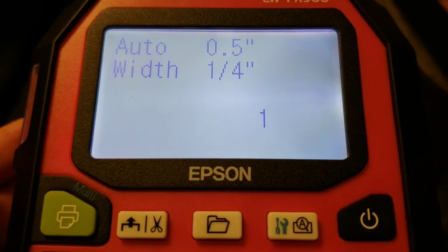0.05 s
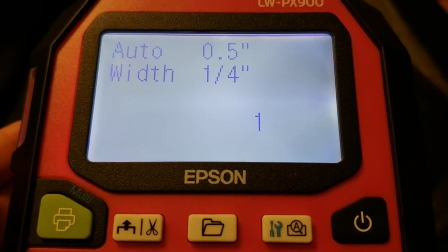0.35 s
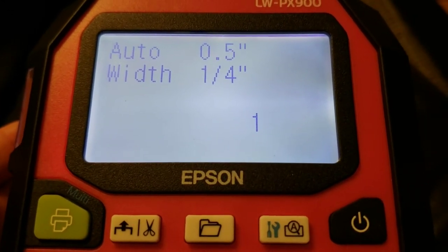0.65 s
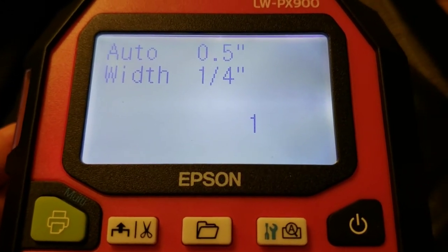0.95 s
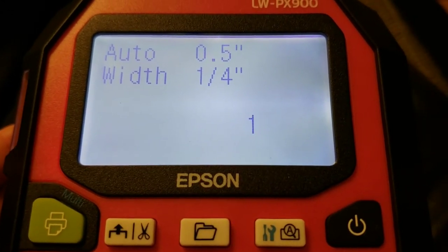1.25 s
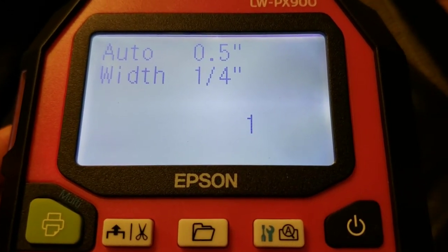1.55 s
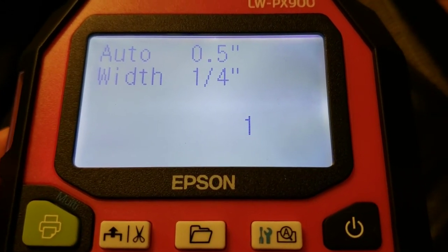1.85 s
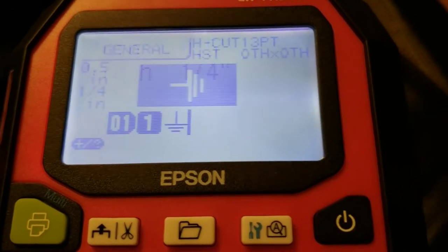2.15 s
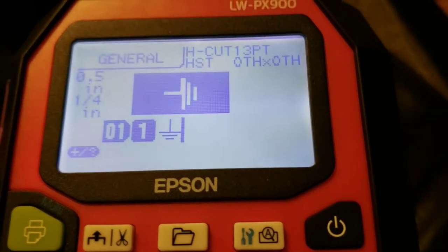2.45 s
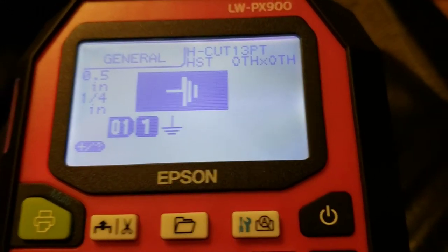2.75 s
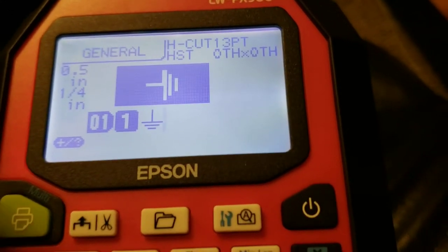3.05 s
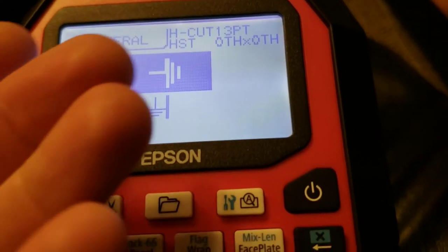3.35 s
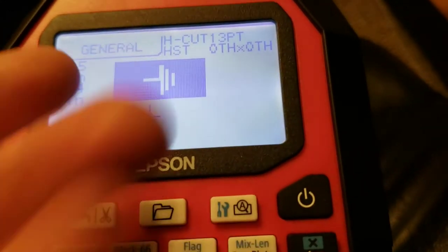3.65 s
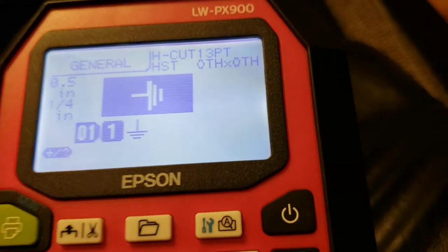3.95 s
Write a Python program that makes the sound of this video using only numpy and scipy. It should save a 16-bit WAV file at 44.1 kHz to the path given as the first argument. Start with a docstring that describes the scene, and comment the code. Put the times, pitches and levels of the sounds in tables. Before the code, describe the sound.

Close up in a quiet room, a small label printer whirs with a shifting pitch and brief scrapes, then buzzes, clicks sharply once and stops. Faint rubbing and two dull bumps of a hand follow over a low hum.

```python
"""A geared motor whines and rattles: a handheld label printer, close by in a quiet room.
Its meshing teeth labour against the scraping cutter, then it reverses and runs back.
A stepper feeds the tape with a fine buzz and one sharp plastic snap.
Afterwards a hand slides over the case and bumps it softly, above a low hum."""
import sys
import numpy as np
from scipy import signal
from scipy.fft import rfft, irfft
from scipy.io import wavfile
from scipy.ndimage import uniform_filter1d

SR = 44100
rng = np.random.default_rng(int(sys.argv[2]) if len(sys.argv) > 2 else 0)


def unload_audio(sound):
    """Save the sound as a 16-bit wav file, at the path given as the first command line argument."""
    columns = np.transpose(np.atleast_2d(sound))
    # keep every value between -1 and 1, then stretch to whole-number steps
    steps = np.round(np.clip(columns, -1, 1) * 32767)
    wavfile.write(sys.argv[1], SR, steps.astype(np.int16))


N = 176400
TIME_S, FREQS_HZ = np.arange(N) / SR, np.fft.rfftfreq(N, 1 / SR)


# Each row: time in seconds, tooth rate in Hz, whine in dB, rattle in dB.
MOTOR_RUN = [(0, 1853, -48.5, -95), (.026, 1419, -44, -54.5), (.045, 1135, -57, -59),
             (.065, 953.5, -62, -57.5), (.135, 660.2, -54, -40.5), (.19, 999, -53, -50),
             (.246, 1406, -44.5, -48), (.285, 1854, -43.5, -49.5), (.345, 2032, -44, -49),
             (.378, 1588, -35.5, -49.5), (.408, 1281, -46, -49.5), (.555, 1280, -41.5, -48),
             (.6, 1266, -45.5, -46.5), (.698, 1271, -44.5, -45.5), (.75, 1280, -47.5, -44),
             (.775, 1197, -69, -43.5), (.82, 662.5, -56, -41), (.855, 962.5, -55, -46.5),
             (.88, 1189, -43.5, -46.5), (.915, 1504, -40, -44), (.943, 1786, -41.5, -48),
             (1.27, 1790, -45, -47), (1.315, 1744, -59, -48), (1.345, 1387, -79, -65),
             (1.42, 999, -125, -125)]
# Each row: multiple of the tooth rate, relative level in dB.
WHINE_OVERTONES = [(2, -16.5), (3, -32)]
# Each row: time in seconds, gain in dB.
OVERTONE_SWELL = [(.34, -13.5), (.45, -2.5), (.9, -0.5)]
RATTLE_TREBLE = [(.15, -2.5), (.45, -4), (.75, -6), (.9, 3), (1.1, 6.5), (1.3, 3)]
# Each row: frequency in Hz, gain in dB.
OVERTONE_CASE_GAIN = [(2200, -3.5), (2570, 3.5), (2900, 0), (5400, 3.5)]
RATTLE_COLOUR = [(59.3, -16.5), (105.5, 2), (150, -14.5), (450, -7.5), (1000, -10.5), (1450, 0),
                 (3300, -17.5), (4020, -20), (4440, -27.5), (7300, -29), (8700, -35), (11200, -32.5),
                 (15300, -48)]
TEETH_PER_TURN, SPEED_JITTER, BACKLASH_RAD = 17, 0.006, 0.4

def geared_motor():
    """Meshing teeth whine and rattle, swelling once per turn of the shaft."""
    tooth_hz = curve(MOTOR_RUN) * (1 + SPEED_JITTER * walk(60))
    teeth = np.cumsum(tooth_hz) / SR
    turns = teeth / TEETH_PER_TURN
    wobble = np.sin(2 * np.pi * turns)
    mesh_rad = 2 * np.pi * teeth + BACKLASH_RAD * walk(420)
    whine = amp(2.6 * walk(130)) * np.sin(mesh_rad)
    for multiple, db in WHINE_OVERTONES:
        level_db = db + curve(OVERTONE_SWELL) + spectrum(multiple * tooth_hz, OVERTONE_CASE_GAIN)
        whine += amp(level_db + 2.6 * walk(130)) * np.sin(multiple * mesh_rad)
    whine = unit(whine * (1 + 0.25 * wobble))
    knocks = impacts(teeth, scatter_db=3, ring_s=0.00072) * (1 + 0.2 * wobble)
    rattle = unit(case(colour(knocks * gear_grit(turns, repeat_db=-3), RATTLE_COLOUR)))
    body = lowpass(rattle, 2900)
    rattle = body + amp(curve(RATTLE_TREBLE)) * (rattle - body)
    return whine * amp(curve(MOTOR_RUN, column=2)) + rattle * amp(curve(MOTOR_RUN, column=3))


def gear_grit(turns, repeat_db):
    """Fresh stereo grit plus a part that repeats on every turn."""
    slots = 420
    position = (turns % 1 * slots).astype(int)
    return stereo_noise() + amp(repeat_db) * stereo_noise()[:, slots + position]


# Each row: start in seconds, length in seconds, relative level in dB.
SCRAPES = [(0.074, 0.031, -32.5), (0.119, 0.0064, -35), (0.191, 0.001, -47.5), (0.778, 0.016, -38.5)]
# Each row: start in seconds, relative level in dB.
GEAR_CATCHES = [(.289, -46.5), (.622, -39), (.693, -48)]
# Each row: frequency in Hz, gain in dB.
SCRAPE_COLOUR = [(400, -11), (970, -14), (1380, 1), (2040, -3), (2980, -5), (4400, -20), (9000, -30),
                 (15800, -32.5)]
SCRAPE_ATTACK_S, SCRAPE_RELEASE_S, SLIP_HZ = 0.0061, 0.0072, 1496

def cutter():
    """The cutter sticks and slips in dense crunches; loaded gear teeth catch."""
    force = 0
    for start_s, length_s, db in SCRAPES:
        attack = np.clip((TIME_S - start_s) / SCRAPE_ATTACK_S + 1, 0, 1)
        release = np.exp(-np.maximum(TIME_S - start_s - length_s, 0) / SCRAPE_RELEASE_S)
        force += amp(db) * attack * release
    slip_hz = SLIP_HZ * amp(2 * walk(2000))
    slips = impacts(np.cumsum(slip_hz) / SR, scatter_db=0.5, ring_s=0.001)
    catches = sum(amp(db) * decay(start_s, ring_s=0.003) for start_s, db in GEAR_CATCHES)
    return case(colour((force * slips + catches) * stereo_noise(), SCRAPE_COLOUR)) * amp(-1.5)


# Each row: time in seconds, body in dB, treble in dB.
FEED_LEVELS = [(1.352, -74, -78), (1.368, -47.5, -69.5), (1.4, -45, -53), (1.47, -47, -52.5),
               (1.75, -46.5, -53), (1.79, -41, -56.5), (1.92, -45.5, -52.5), (2.005, -51, -60),
               (2.045, -56.5, -76), (2.07, -64, -76), (2.25, -125, -125)]
# Each row: frequency in Hz, gain in dB.
FEED_COLOUR = [(870, -17.5), (1327, -2), (2100, 0), (2560, -16.5), (3780, -9), (4660, -16), (5680, -22.5),
               (6800, -16.5), (8060, -24), (9120, -36.5), (11900, -25), (15500, -29)]
STEP_HZ, STEPS_PER_TURN, TAPE_GRIT = 245.4, 3, 0.87

def tape_feed():
    """Motor steps tick through the gears, over the grit of the moving tape."""
    steps = STEP_HZ * TIME_S
    ticks = impacts(steps, scatter_db=3, ring_s=0.0032, accent_db=1)
    grit = gear_grit(steps / STEPS_PER_TURN, repeat_db=-6)
    buzz = unit(case(colour((ticks + TAPE_GRIT) * grit, FEED_COLOUR)))
    body = lowpass(buzz, 4000)
    return unit(body) * amp(curve(FEED_LEVELS)) + unit(buzz - body) * amp(curve(FEED_LEVELS, column=2))


# Each row: start in seconds, level in dB, decay in seconds.
CLICKS = [(1.7619, -23.5, .0011), (3.382, -52, .0012), (3.408, -70, .008)]
CASE_KNOCK = (1.7637, -32, 0.0088)
# Each row: frequency in Hz, gain in dB.
CLICK_COLOUR = [(300, -14), (1400, -5), (6000, -2), (9000, -10), (12000, -2)]
KNOCK_COLOUR = [(100, -24), (346, 5), (700, 7), (2840, 4.5), (5070, -10.5)]

def clicks():
    """Plastic parts snap; the hardest snap knocks the whole case."""
    snaps = sum(amp(db) * decay(start_s, ring_s) for start_s, db, ring_s in CLICKS)
    start_s, db, ring_s = CASE_KNOCK
    knock = amp(db) * decay(start_s, ring_s)
    return colour(snaps * stereo_noise(), CLICK_COLOUR) + colour(knock * stereo_noise(), KNOCK_COLOUR)


# Each row: frequency in Hz, bandwidth in Hz, gain in dB.
CASE_MODES = [(747, 17, -0.5), (1336, 26, -3.5), (1467, 74, -5), (2080, 23, -3), (2328, 7.5, -12.5),
              (3160, 18, 3.5)]

def case(x):
    """The plastic case adds its resonances."""
    return x + sum(amp(db) * signal.lfilter(*signal.iirpeak(hz, hz / width_hz, SR), x)
                   for hz, width_hz, db in CASE_MODES)


# Each row: start in seconds, end in seconds, pitch in Hz, level in dB.
FEED_WHINES = [(1.359, 2.051, 1448, -55.5), (1.769, 1.967, 1288, -53), (1.78, 1.939, 757, -58.5)]

def feed_whines():
    """The loaded feed gears sing on a few wavering notes."""
    notes = 0
    for start_s, end_s, hz, db in FEED_WHINES:
        level = amp(db + 2 * walk(120)) * gate(start_s, end_s, ramp_s=0.0067)
        notes += level * np.sin(2 * np.pi * hz * TIME_S + 0.31 * walk(60))
    return notes


# One row: start in seconds, end in seconds, pitch in Hz, level in dB, fall in dB per second.
MOTOR_WHISTLE = (.405, .7, 7480, -68, 28)

def motor_whistle():
    """A thin, fading note of the loaded motor."""
    start_s, end_s, hz, db, fall_db_per_s = MOTOR_WHISTLE
    level = amp(db - fall_db_per_s * (TIME_S - start_s) + 2 * walk(90.6))
    tone = np.sin(2 * np.pi * hz * TIME_S + 0.66 * walk(90))
    return gate(start_s, end_s, ramp_s=0.01) * level * tone


# Each row: start in seconds, peak in dB.
BUMPS = [(2.857, -43.5), (2.88, -39.5), (2.893, -30), (2.903, -40), (3.135, -26.5), (3.192, -43.5)]
# Each row: frequency in Hz, gain in dB.
BUMP_COLOUR = [(40, -19), (110, -0.5), (220, 5), (400, -3.5), (650, -10), (1000, -27.5), (1600, -29),
               (9000, -67)]

def hand_bumps():
    """Soft skin strikes the case: dull thuds with short noisy tails."""
    pushes = np.zeros(N)
    for start_s, db in BUMPS:
        pushes[int(start_s * SR)] += amp(db)
    blow = amp(-11) * unit(decay(0, ring_s=0.014) * stereo_noise()) / np.sqrt(N)
    blow[:, 0] += 1  # impulse ahead of the tail
    thud = signal.sosfilt(signal.butter(2, 1100, fs=SR, output="sos"), colour(blow, BUMP_COLOUR))
    return signal.fftconvolve(pushes[None], thud / np.abs(thud).max(), axes=1)[:, :N]


# Each row: centre in seconds, half length in seconds, then rub, rustle and sheen in dB.
STROKES = [(2.117, 0.13, -69, -78, -100), (2.366, 0.13, -66.5, -66.5, -64), (2.797, 0.24, -80, -73, -75),
           (3.048, 0.012, -97, -93, -72), (3.198, 0.047, -81.5, -80.5, -90),
           (3.84, 0.079, -78.5, -75.5, -75)]
# One table each for rub, rustle and sheen. Each row: frequency in Hz, gain in dB.
STROKE_COLOURS = [
    [(1200, -8.5), (2500, 0), (5500, -0.5), (9000, -32)],
    [(4500, -27.5), (7000, -1.5), (10000, -29)],
    [(8500, -14), (11500, -5)],
]

def hand_strokes():
    """Skin slides over the case in grainy swells of three noise bands."""
    strokes = np.array(STROKES)
    centre_s, half_s, bands_db = strokes[:, :1], strokes[:, 1:2], strokes[:, 2:]
    levels = amp(bands_db).T @ swell(centre_s, half_s) * amp(walk(200))
    return sum(colour(stereo_noise() * level, rows) for level, rows in zip(levels, STROKE_COLOURS))


# Each row: time in seconds, level in dB.
RUMBLE_LEVEL = [(0, -63), (1.7, -57.5), (2.1, -59), (2.18, -56.5), (2.24, -58.5), (2.65, -59.5), (4, -72)]
# Each row: frequency in Hz, gain in dB.
RUMBLE_COLOUR = [(26, -40.5), (43, 1), (62, 0), (100, -1), (170, -11), (330, -15.5), (550, -34),
                 (1200, -47.5)]

def hand_rumble():
    """The held case rumbles."""
    return colour(stereo_noise(), RUMBLE_COLOUR) * amp(curve(RUMBLE_LEVEL))


# Each row: centre in seconds, half length in seconds, pitch in Hz, glide in Hz per second, level in dB.
SQUEAKS = [(3.405, .025, 2560, 9500, -79), (3.845, .08, 1910, 0, -75)]

def faint_squeaks():
    """A faint rising chirp, then a soft, rough, steady whistle."""
    tones = 0
    for centre_s, half_s, hz, glide_hz_per_s, db in SQUEAKS:
        offset_s = TIME_S - centre_s
        cycles = offset_s * (hz + glide_hz_per_s * offset_s / 2)
        level = amp(db + 3 * walk(194)) * swell(centre_s, half_s)
        tones += level * np.sin(2 * np.pi * cycles + 1.3 * walk(400))
    return tones


# Each row: frequency in Hz, gain in dB.
AIR_COLOUR = [(20, -33), (55, 0.5), (140, -10), (330, -14), (550, -28), (1200, -34), (5500, -43.5),
              (7300, -48.5), (8800, -57), (12000, -39), (15500, -42)]
AIR_DB, HUM_HZ, HUM_DB = -62.5, 59.6, -61

def room():
    """A wavering low hum over quiet air."""
    air = colour(stereo_noise() + rng.standard_normal((2, N)), AIR_COLOUR)
    hum = np.sin(2 * np.pi * HUM_HZ * TIME_S + 0.33 * walk(8.3)) * amp(2 * walk(16))
    return amp(AIR_DB) * unit(air) + amp(HUM_DB) * unit(hum)


# Each row: frequency in Hz, left minus right in dB.
MIC_BALANCE = [(400, -1), (950, 5.5), (1500, -4), (2200, -7), (2850, 5), (5000, 2.5), (6600, 23.5),
               (10000, 16), (12000, 3.5)]
# Each row: frequency in Hz, lead of the left in radians.
MIC_PHASE = [(200, 0), (1250, .5), (1800, 2.7), (2400, 6.2), (3000, 7), (3900, 13.5), (5000, 10.8),
             (7000, 12.6)]

def microphones(x):
    """Two microphones hear a close sound from different sides."""
    split = np.array([[0.5], [-0.5]])
    gain = amp(split * spectrum(FREQS_HZ, MIC_BALANCE))
    gain /= np.sqrt(np.mean(gain ** 2, axis=0))
    return irfft(rfft(x) * gain * np.exp(1j * split * spectrum(FREQS_HZ, MIC_PHASE)), N)


# Each row: frequency in Hz, correlation of left and right.
STEREO_CORRELATION = [(300, .96), (1700, .85), (2200, .65), (7000, .35)]

def stereo_noise():
    """Noise whose sides move together in the bass, more independently above."""
    alike = spectrum(FREQS_HZ, STEREO_CORRELATION)
    mid, side = rfft(rng.standard_normal((2, N))) * np.sqrt([(1 + alike) / 2, (1 - alike) / 2])
    return irfft([mid + side, mid - side], N)


def impacts(cycles, scatter_db, ring_s, accent_db=0):
    """Envelope of one uneven, decaying impact per cycle; every third takes the accent."""
    hits = np.flatnonzero(np.diff(np.floor(cycles)) > 0)
    kicks = np.zeros(N)
    kicks[hits] = amp(scatter_db * rng.standard_normal(N)[:len(hits)])
    kicks[hits[::3]] *= amp(accent_db)
    return unit(signal.lfilter([1], [1, -np.exp(-1 / (ring_s * SR))], kicks))


def decay(start_s, ring_s):
    """Sudden start, exponential decay."""
    return (TIME_S >= start_s) * np.exp(-np.maximum(TIME_S - start_s, 0) / ring_s)


def gate(start_s, end_s, ramp_s):
    """Flat envelope with linear ramps."""
    return np.clip(np.minimum(TIME_S - start_s, end_s - TIME_S) / ramp_s, 0, 1)


def swell(centre_s, half_s):
    """Gaussian envelope."""
    return np.exp(-((TIME_S - centre_s) / half_s) ** 2)


def walk(rate_hz):
    """Smooth random drift, rms 1."""
    hold = max(int(SR / rate_hz), 2)
    stairs = np.repeat(rng.standard_normal(N // hold + 1), hold)
    return unit(uniform_filter1d(stairs, hold)[:N])


def curve(rows, column=1):
    """One column, interpolated over time."""
    rows = np.array(rows, float)
    return np.interp(TIME_S, rows[:, 0], rows[:, column])


def spectrum(hz, rows):
    """A table, interpolated over log frequency."""
    rows = np.array(rows, float)
    return np.interp(np.log(np.maximum(hz, 1)), np.log(rows[:, 0]), rows[:, 1])


def colour(x, rows):
    """Minimum-phase filter of unit power, shaped by (Hz, dB) points."""
    size = 8192
    gain = amp(spectrum(np.fft.rfftfreq(size, 1 / SR), rows))
    cepstrum = irfft(np.log(gain))
    cepstrum[1:size // 2] *= 2
    cepstrum[size // 2 + 1:] = 0
    response = irfft(np.exp(rfft(cepstrum)))
    return signal.fftconvolve(x, unit(response)[None] / np.sqrt(size), axes=1)[:, :N]


def lowpass(x, hz):
    """Zero-phase low-pass."""
    return signal.sosfiltfilt(signal.butter(3, hz, fs=SR, output="sos"), x)


def amp(db):
    """Decibels to gain."""
    return 10 ** (np.asarray(db) / 20)


def unit(x):
    """Scale to rms 1."""
    return x / np.sqrt(np.mean(x ** 2))


def scene():
    """Printer and hand close to the microphones, in the room."""
    printer = geared_motor() + motor_whistle() + cutter() + tape_feed() + feed_whines() + clicks()
    hand = hand_bumps() + hand_strokes() + hand_rumble()
    return microphones(printer + hand + faint_squeaks()) + room()


def record(dry):
    """Steep low-pass at 15850 Hz."""
    return signal.sosfilt(signal.ellip(10, .2, 70, 15850, fs=SR, output="sos"), dry)


dry = scene()
out = record(dry)
unload_audio(out)
```